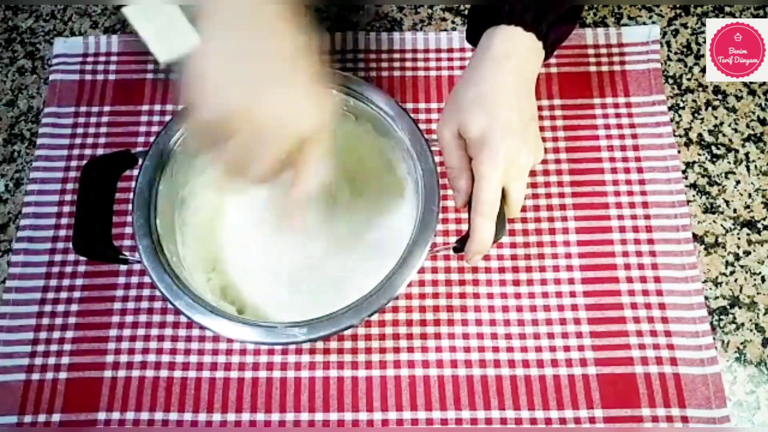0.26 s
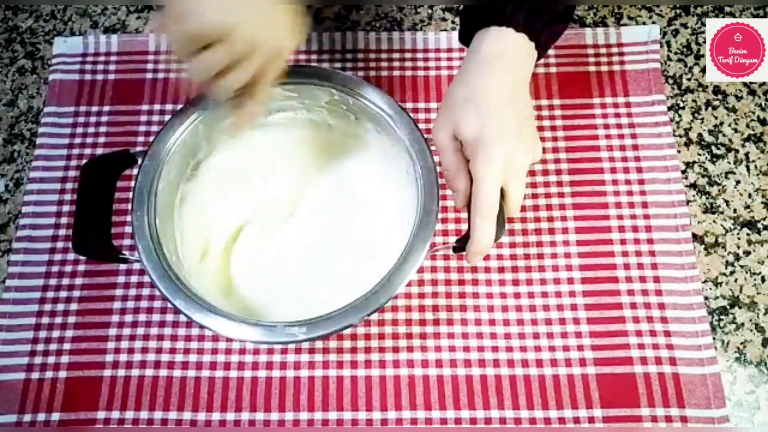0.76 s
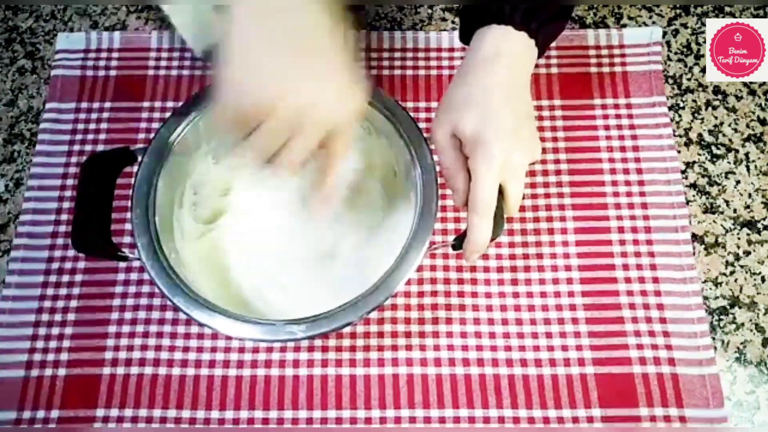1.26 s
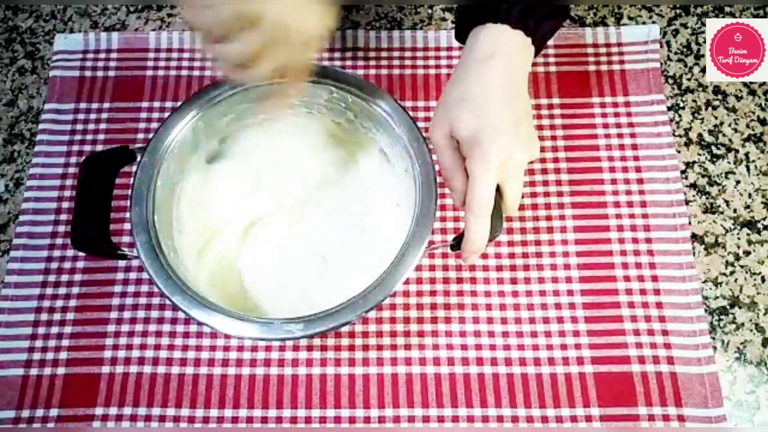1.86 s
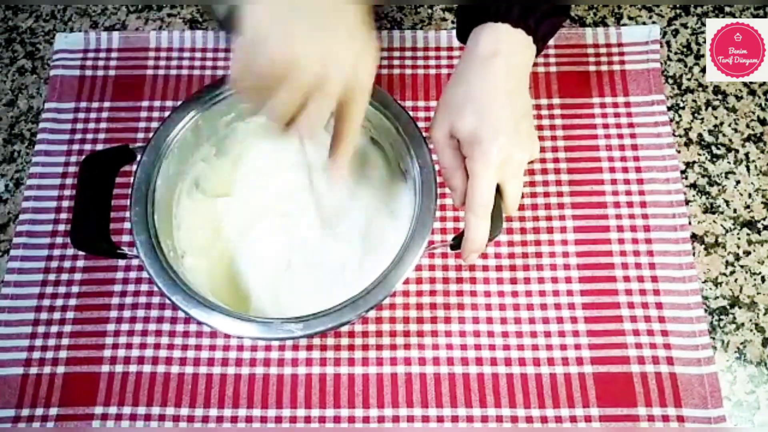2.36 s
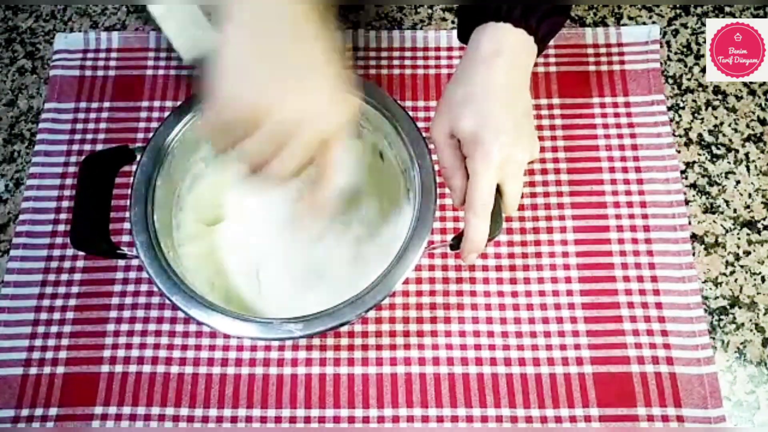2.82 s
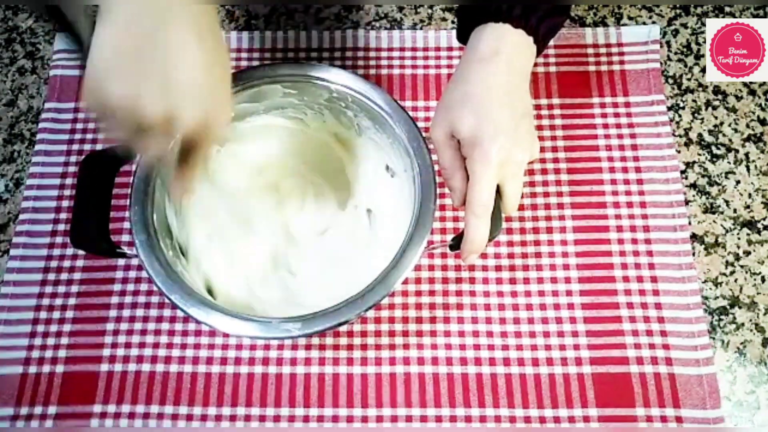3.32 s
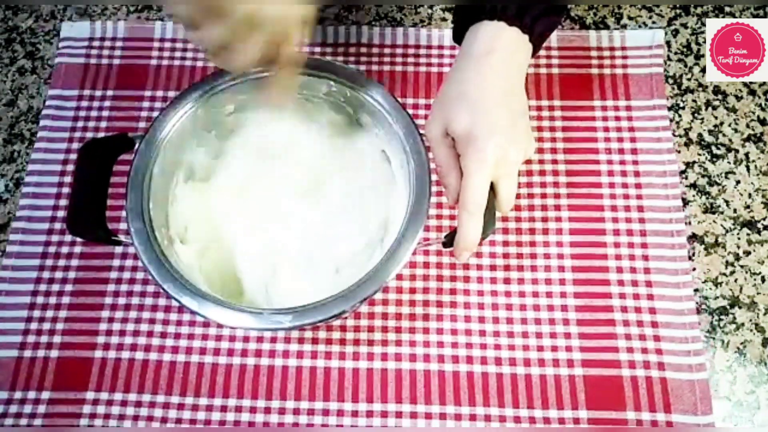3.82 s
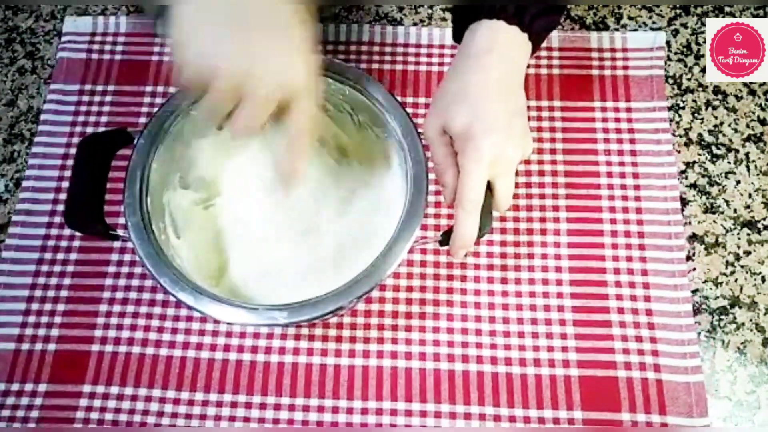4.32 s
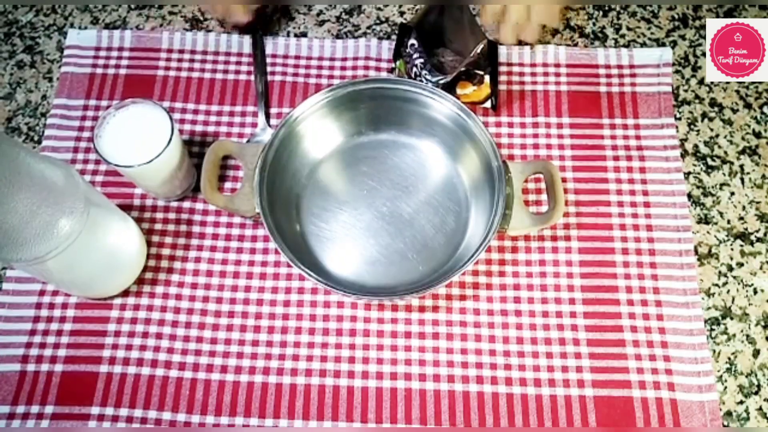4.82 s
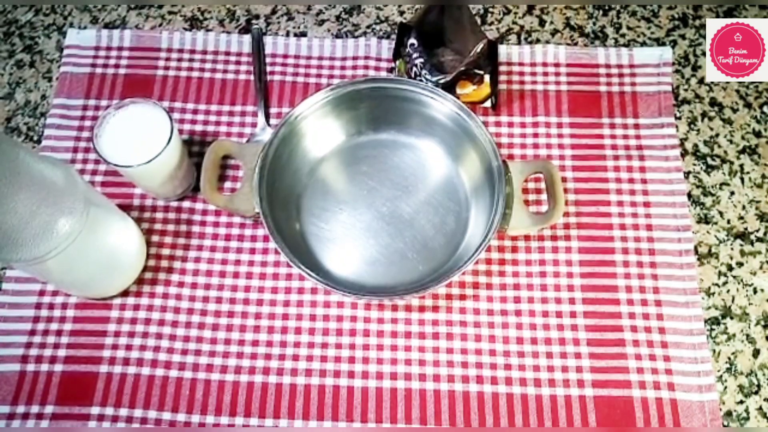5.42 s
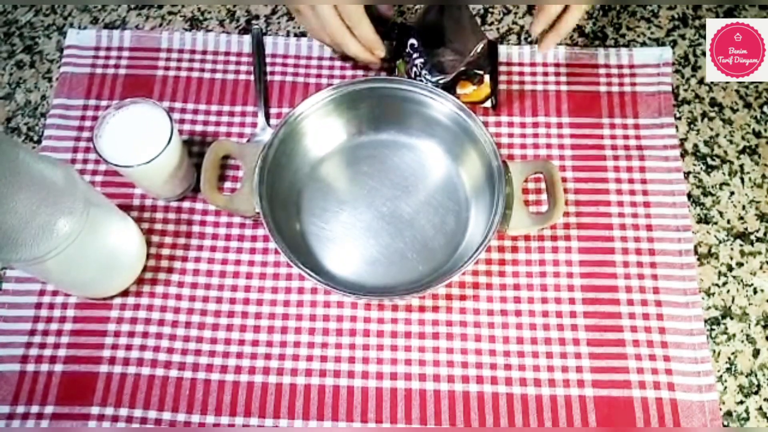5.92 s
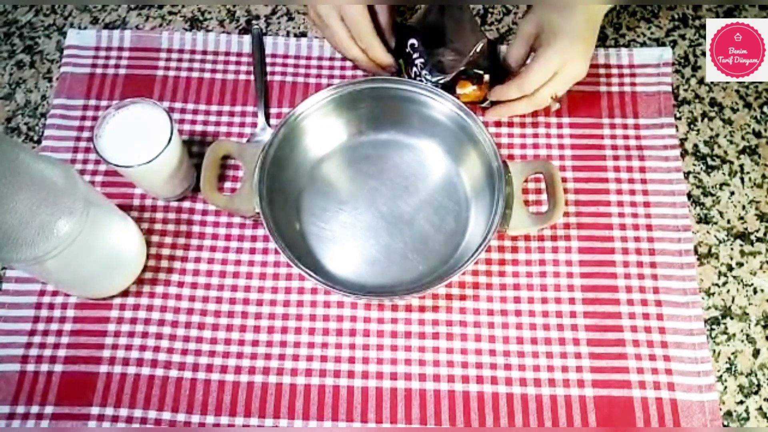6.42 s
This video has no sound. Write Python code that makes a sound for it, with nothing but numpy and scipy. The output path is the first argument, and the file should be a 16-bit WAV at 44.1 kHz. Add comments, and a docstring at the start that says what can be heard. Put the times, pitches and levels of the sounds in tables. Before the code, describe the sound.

Brisk metallic whisking and wet slosh in a metal pot stops dead, leaving faint hum, tiny ticks and thuds, and a brief foil rustle.

```python
"""Whisking cream, then a quiet kitchen

A wire whisk beats cream in a steel pot under a two-port phone microphone. Slip grains and noise make the
scrape and slosh, noise bursts with pings the taps, damped sines and resonances the pot's dull ring.
A hard edit silences it; a quiet kitchen fades in from shaped noise and mains sines, with damped-sine ticks,
thuds and faint thin high tones of a stirring wrapper, and the crackle of a foil sachet."""
import sys
import numpy as np
from scipy import signal
from scipy.fft import rfft, irfft, next_fast_len
from scipy.io import wavfile
from scipy.ndimage import uniform_filter1d, map_coordinates

SR = 44100
rng = np.random.default_rng(int(sys.argv[2]) if len(sys.argv) > 2 else 0)


def store_pcm(level_fs):
    """Save levels as 16-bit WAV."""
    pcm = np.round(np.clip(level_fs, -1, 1) * 32767).astype(np.int16)
    wavfile.write(sys.argv[1], SR, np.atleast_2d(pcm).T)


N = 294361
SCRAPE_TOP_HZ = 14350  # steep ceiling of the stirring and of cushioned taps


def whisk():
    """Several wires scrape at once; their slips shake the pot and stir the cream."""
    wire_db, slosh_db, body_db, wall_db, song_db = sweeps()
    flutter = amp(1.2 * wobble(40) + 1.8 * wobble(180))  # wires touch and leave the wall
    stir = amp(wire_db) * unit(scrape(flutter))
    stir = stir + amp(song_db) * unit(wire_song(flutter)) + skids()
    stir = stir + amp(slosh_db) * unit(slosh(flutter, wall_db))
    stir = stir + amp(body_db) * unit(pot_body())
    stir = filtered(amp(-1.5) * stir, scrape_ceiling)
    return stir + taps() + knocks() + plops()


# one sweep of the wires along the wall: start_s, swell_s, contact_s, scrape_landing_db, scrape_top_db,
# slosh_db, pot_body_db, wall_ring_db (re slosh), wire_song_db (re scrape top)
SWEEP_ROWS = [(0.0, 0.0063, 0.048, -26, -42.5, -50.5, -46, -2, -5),
              (.223, 0.073, .15, -28, -33.5, -47.5, -50, 2, -4.5),
              (0.502, 0.078, 0.23, -48.5, -32, -59.5, -48.5, -3, -4.5),
              (0.791, 0.016, .024, -34, -40, -61, -58.5, -2, 0),
              (.875, 0.13, 0.13, -37, -34, -50, -52.5, -0.5, -11),
              (1.04, 0.094, 0.16, -33, -36.5, -49, -53, -5.5, -12),
              (1.234, 0.097, .27, -32, -33.5, -50, -52.5, -2.5, -9.5),
              (1.449, 0.037, 0.049, -33, -33.5, -51, -52.5, -3, -8),
              (1.556, 0.1, 0.24, -38, -30.5, -46, -51, -4.5, -2),
              (1.98, 0.18, .29, -34, -32.5, -48, -53.5, -1, -6),
              (2.35, .01, 0.011, -39, -42.5, -60, -58, -3, -5),
              (2.379, 0.049, 0.05, -33.5, -31.5, -46, -48, -7, -6),
              (2.488, .01, 0.038, -36, -35.5, -50.5, -52, -3.5, -5),
              (2.547, .011, 0.004, -29, -34.5, -44.5, -46.5, -7.5, -13),
              (2.743, 0.13, .19, -36, -29.5, -48.5, -52.5, 2.5, -4.5),
              (3.005, .01, 0.073, -29, -39.5, -53.5, -55.5, -5, -4),
              (3.15, 0.085, 0.24, -33, -26.5, -42.5, -44.5, -4, -9.5),
              (3.52, 0.1, 0.24, -33.5, -25.5, -41.5, -48, -4.5, -5),
              (3.903, 0.094, 0.2, -35.5, -26.5, -42.5, -44, -8.5, -4),
              (4.14, .011, 0.08, -39.5, -32.5, -49.5, -47.5, -2, -4.5),
              (4.282, .12, 0.14, -36.5, -28.5, -43.5, -45, -5.5, 1)]
SAG_DB_PER_S, LIFT_DB_PER_S = 50.5, 220  # scrape past its top, and once the wires leave the wall
DRAG_DB = 6  # extra scrape drop while the wires only drag through cream
SLOSH_SAG_DB_PER_S, SLOSH_LIFT_DB_PER_S = 24.5, 94
WALL_FADE_DB_PER_S = 45
BODY_FOLLOWS, SONG_GROWS = 0.66, 1.2  # shares of the scrape's swing


def sweeps():
    """Levels of scrape, slosh, body, wall ring and song: each sweep lands at once, swells, sags, lifts off."""
    t = np.arange(N) / SR
    rows = np.array(SWEEP_ROWS)
    current = np.maximum(np.searchsorted(rows[:, 0], t, "right") - 1, 0)
    start, swell, contact, first_db, top_db, slosh_db, body_db, wall_db, song_db = rows.T[:, current]
    age = t - start
    off = np.maximum(age - contact, 0)
    swell_db = (first_db - top_db) * np.maximum(1 - age / swell, 0)
    sag_db = SAG_DB_PER_S * np.maximum(age - swell, 0)
    lift_db = np.minimum(LIFT_DB_PER_S * off, DRAG_DB + SAG_DB_PER_S * off)
    swing_db = swell_db - sag_db - lift_db
    return (top_db + swing_db,
            slosh_db - SLOSH_SAG_DB_PER_S * age - SLOSH_LIFT_DB_PER_S * off,
            body_db + BODY_FOLLOWS * swing_db,
            wall_db - WALL_FADE_DB_PER_S * age,
            top_db + song_db + SONG_GROWS * np.minimum(swing_db, 0))


# scraping wire colour: freq_hz, relative_db
WIRE_COLOUR = [(1760, -24.5), (3000, -11.5), (4200, -7.5), (5700, -7), (7840, 0.5), (10600, -6.5),
               (12200, -13.5), (13800, -12.5), (16400, -30)]


def scrape(flutter):
    """Wires stick and slip on the wall: bright slip grains over noise, the colour drifting."""
    slips = grains(per_s=1300, hz=7077, wide=0.22, cycles=4, spread_db=2.0, scatter=1.4, size=96)
    rub = slips + 0.7 * rng.standard_normal((2, N))
    return patchy(coloured(flutter * rub, WIRE_COLOUR), depth_db=3)


def scrape_ceiling(hz):
    """Steep low-pass at the top of the scrape."""
    return 1 / (1 + (hz / SCRAPE_TOP_HZ) ** 80)


def wire_song(flutter):
    """Pressed wires sing in a wandering band."""
    slips = grains(per_s=800, hz=7700, wide=0.18, cycles=4, spread_db=1, scatter=1.5, size=64)
    return wander(flutter * slips, [7100, 7700, 8270], width_hz=510, depth_db=4, rate=25)


# a wire skids briefly: middle_s, level_db, length_s, colour_hz
SKID_ROWS = [(.078, -31.5, 0.014, 8000), (.292, -29.5, 0.012, 6200), (.34, -29.5, 0.024, 8200),
             (.605, -28.5, .015, 7500), (.822, -31, 0.01, 6440), (.993, -34, .02, 8300),
             (1.135, -26, .01, 7200), (1.145, -27, 0.0047, 7200), (1.29, -33, .02, 7500),
             (1.322, -32, .01, 8800), (1.505, -34.5, .018, 8050), (1.672, -27, 0.017, 7600),
             (1.72, -31, .012, 7950), (3.012, -30.5, 0.012, 8500), (3.305, -23.5, 0.014, 7300),
             (4.069, -28, 0.014, 7640), (4.442, -26, .012, 7400)]
# a loose wire rings until the cream stops it: start_s, level_db, pitch_hz, length_s
LOOSE_WIRE = [(4.165, -44.5, 7569, .105)]
SKID_WIDTH = 0.12  # of its colour frequency


def skids():
    """Short rough rubs of resonated noise, each with its own colour, and the sine of a loose wire."""
    out = np.zeros((2, N + SR))
    half = 1500  # samples
    for middle_s, db, length_s, hz in SKID_ROWS:
        t = np.arange(-half, half) / SR
        b, a = signal.iirpeak(hz, 1 / SKID_WIDTH, SR)
        rub = unit(signal.lfilter(b, a, rng.standard_normal((2, len(t)))))
        swell = np.exp(-(2 * t / length_s) ** 2)
        out[:, round(middle_s * SR) - half:][:, :len(t)] += amp(db) * swell * rub
    for start_s, db, hz, length_s in LOOSE_WIRE:
        t = np.arange(int(length_s * SR)) / SR
        arch = np.sin(np.pi * t / length_s) ** .5
        out[:, round(start_s * SR):][:, :len(t)] += amp(db) * arch * np.sin(2 * np.pi * hz * t)
    return out[:, :N]


# cream colour: freq_hz, relative_db
CREAM_COLOUR = [(470, -39.5), (800, -0.5), (934, -9), (1140, -0.5), (1480, -3), (2110, -2.5), (2500, 0.5),
                (3030, -2.5), (4000, -23.5), (5200, -19.5), (8800, -120)]


def slosh(flutter, wall_db):
    """Cream splashes as lower-pitched grains in noise; the wall's ring near 2.6 kHz wavers in level."""
    drops = grains(per_s=900, hz=1822, wide=0.499, cycles=5.2, spread_db=3.5, scatter=5, size=320)
    splash = coloured(flutter * (drops + 1.6 * rng.standard_normal((2, N))), CREAM_COLOUR)
    wall = wander(splash, [2570, 2570, 2550], width_hz=230, depth_db=6, rate=15)
    return patchy(splash + amp(wall_db) * wall, depth_db=4.0)


# pot resonances: centre_hz, width_hz, gain_db
POT_MODES = [(235, 150, -6.5), (320.6, 13, -2), (470.7, 2, 2), (599, 73, 4), (722, 69, -1)]


def pot_modes(f):
    """Response of the steel pot: resonances summed with alternating sign."""
    return sum((-1) ** k * amp(db) * resonance(f, hz, width_hz)
               for k, (hz, width_hz, db) in enumerate(POT_MODES))


def pot_body():
    """Low bumps drive the pot's resonances."""
    bumps = grains(per_s=250, hz=564, wide=0.57, cycles=0.64, spread_db=4.5, scatter=4.1, size=200)
    return filtered(amp(1.1 * wobble(40)) * bumps, pot_modes)


# wire on wall: start_s, level_db, dull_db, left_minus_right_db
TAP_ROWS = [(0.0701, -27.5, -27, 7.5), (0.2256, -13, -16, -1.5), (0.326, -28.5, -27, 13),
            (0.5645, -21, -12, -3.5), (0.578, -15, -13, -1), (0.629, -14, -32, 2), (0.692, -27, -9.5, 4),
            (0.7927, -28, -29, 0), (0.819, -23, -42, 4.5), (0.89, -28, -27, 6.5), (0.9052, -18.5, -32, -3),
            (1.0536, -34, -26, -3), (1.119, -13.5, -34, -8), (1.2366, -10.5, -20, -5.5),
            (1.277, -26, -18, 13), (1.3186, -28.5, -34, 18), (1.3424, -30, -24, 7), (1.463, -29, -28, -9),
            (1.473, -25, -20, 16.5), (1.5565, -12, -18.5, 1), (1.587, -18, -22, -6), (1.6672, -13, -13, 0),
            (1.905, -40.5, -27, 6), (1.931, -27, -4.5, -2.5), (1.9847, -13, -19.5, -5),
            (2.001, -21, -22, 2), (2.0672, -13, -30, 0.5), (2.103, -20.5, -33, 9), (2.1444, -17, -28, -5.5),
            (2.381, -20.5, -29, -4.5), (2.4139, -25, -19.5, 12), (2.4882, -18, -29, 0.5),
            (2.55, -7, -10.5, 3), (2.7459, -27.5, -32, 17), (2.755, -29, -16, 0),
            (2.7786, -17.5, -18.5, -4), (2.8386, -25.5, -25.5, -1.5), (3.006, -20, -21, 1),
            (3.1246, -16, -12, 1), (3.1506, -11, -36, -2), (3.18, -21, -23, 4), (3.224, -16, -20.5, 3.5),
            (3.2322, -10.5, -19.5, 5.5), (3.31, -17, -5.5, -2.5), (3.523, -11.5, -18.5, -1),
            (3.6135, -18, -10.5, 2.5), (3.905, -33, -6, -4), (3.9284, -28.5, -24.5, 2),
            (4.0061, -20.5, -31, -0.5), (4.009, -10, -25, 4), (4.092, -18.5, -39.5, -0.5),
            (4.1622, -12, -45.5, 3), (4.219, -25, -31, 0), (4.285, -7, -34.5, 0),
            (4.3173, -15.5, -20.5, -4.5), (4.349, -12.5, -18.5, -0.5), (4.404, -17.5, -30, -4.5),
            (4.413, -13.5, -18, 1.5)]
# taps square on the steel: start_s
HARD_TAPS = [.2256, 1.119, 1.2359, 1.5569, 1.931, 2.55, 2.7784, 3.1243, 3.1508, 3.523, 4.285]
PING_HZ, PING_SPREAD = 7580, 0.085  # each tap pings a different wire
SOFT_HZ = 11100  # cream cushions the other taps above this


def taps():
    """Wires strike the wall; only taps square on the steel keep their full treble."""
    rows = [(*row, PING_HZ * np.exp(PING_SPREAD * rng.standard_normal())) for row in TAP_ROWS]
    hard = [row for row in rows if np.min(np.abs(row[0] - np.array(HARD_TAPS))) < .004]
    soft = [row for row in rows if row not in hard]
    hard_taps = snaps(hard, WIRE_COLOUR, CREAM_COLOUR, t60=0.0087)
    soft_taps = snaps(soft, WIRE_COLOUR, CREAM_COLOUR, t60=0.0082)
    cushion = lambda hz: amp(4) / (1 + 1j * hz / SOFT_HZ) * scrape_ceiling(hz)
    return hard_taps + filtered(soft_taps, cushion)


# whisk head on the bottom: start_s, level_db, ring_hz
KNOCK_ROWS = [(0.227, -35, 605), (0.393, -34, 510), (1.118, -37, 634), (1.26, -38.5, 586),
              (1.613, -41, 620), (1.874, -41.5, 605), (2.116, -37.5, 625), (2.529, -26, 524),
              (2.56, -31.5, 474), (2.608, -37, 440), (3.18, -39.5, 610), (3.313, -34, 703),
              (3.37, -33.5, 590), (3.601, -30.5, 606), (3.987, -36, 640), (4.114, -32.5, 640),
              (4.319, -34.5, 610), (4.374, -31, 573)]
CRACK_DB = -16.5  # crack re the row's level


def knocks():
    """The whisk head hits the bottom: a short ring, a crack, and the pot singing on after the blow."""
    ring = rings([(s, db, hz, .024) for s, db, hz in KNOCK_ROWS], rough=.15, rise=0.00035)
    crack_rows = [(s, db + CRACK_DB, -20, 0, hz) for s, db, hz in KNOCK_ROWS]
    crack = snaps(crack_rows, CREAM_COLOUR, WIRE_COLOUR, t60=0.0042)
    return ring + amp(4.5) * filtered(ring, pot_modes) + crack


# a wire slaps through the cream: start_s, level_db, ring_hz
PLOP_ROWS = [(0.5634, -33, 2600), (1.238, -39, 2730), (1.474, -34, 2680), (1.5857, -35, 1850),
             (1.6681, -35, 2670), (1.6885, -37, 2480), (1.8068, -36, 2800), (1.8756, -41, 1660),
             (2.4477, -28.5, 1440), (2.7831, -34.5, 2540), (3.3139, -21, 1560), (3.5402, -27, 1787),
             (3.6025, -31, 1310), (3.6244, -40, 2910), (3.907, -29, 2530), (4.0108, -33.5, 1440),
             (4.1153, -39, 1440), (4.3233, -27.5, 1120), (4.3774, -30.5, 1170)]


def plops():
    """Wires slap the cream: cream-coloured bursts with a lower ping."""
    rows = [(s, db, -6, 0, hz) for s, db, hz in PLOP_ROWS]
    return snaps(rows, CREAM_COLOUR, CREAM_COLOUR, t60=0.0094)


# port colour: freq_hz, left_minus_right_db
PORT_COLOUR = [(60, 5.5), (99, -5.5), (160, 1.5), (270, 0.5), (450, -0.5), (740, 0), (1220, 0.5),
               (2010, -1), (3330, 1.5), (5500, -5), (9080, 7.5), (15000, 3.5)]
LAG_S = 6 / SR


def ports(x):
    """The right port hears the sound first; each port has its own colour."""
    side = np.array([[1], [-1]]) / 2

    def response(hz):
        return amp(side * along(PORT_COLOUR, hz)) * np.exp(-2j * np.pi * hz * side * LAG_S)

    return filtered(x, response)


# reverberation: freq_hz, t60_s
KITCHEN_DECAY = [(200, 0.409), (1000, 0.31), (5000, 0.21), (13500, 0.22), (15000, 0.017)]
# likeness of the room at both ports: freq_hz, shared_power_fraction
KITCHEN_SHARE = [(100, 0.95), (600, 1), (1500, 0.18), (4000, 0.041)]


def kitchen(x, wet_db, step=SR // 4):
    """Tiled walls answer with decaying noise, redrawn for each step, its bass alike at both ports."""
    out = np.zeros((2, N + SR))
    for a in range(0, N, step):
        hz, t, z = signal.stft(rng.standard_normal((3, SR // 2)), SR, nperseg=256)
        share = np.clip(along(KITCHEN_SHARE, hz), 0, 1)[:, None]
        z = np.sqrt(share) * z[0] + np.sqrt(1 - share) * z[1:]
        decay = amp(-60 * t / along(KITCHEN_DECAY, hz)[:, None])
        tail = signal.istft(z * decay, SR, nperseg=256)[1]
        wet = signal.fftconvolve(x[:, a:a + step], tail / np.linalg.norm(tail[0]), axes=1)
        out[:, a + 130:][:, :wet.shape[1]] += wet  # 130 samples of pre-delay
    return x + amp(wet_db) * out[:, :N]


# boom level: time_s, level_db
BOOM_LEVEL = [(0.0, -62), (0.3, -71), (1.4, -62.5), (1.9, -71.5), (2.1, -59.5), (2.6, -60), (2.75, -67.5),
              (3.85, -64), (4.0, -52), (4.47, -64.5)]


def counter_boom():
    """The counter booms under the rocking pot: a narrow low noise band with a moving level."""
    colour = [(40, -36.5), (70, -9.0), (85, 3.0), (110, -11.0), (200, -46.5)]  # freq_hz, relative_db
    return amp(curves(BOOM_LEVEL)[0]) * room_tone(colour, own=0.18)


# first room tone: freq_hz, relative_db
RUMBLE_COLOUR = [(15, -50.5), (25, -13), (49, -14), (77, -6.5), (102, 3), (231, 4.5), (291, -4.5),
                 (413, -13.5), (450, -7.5), (580, -36), (990, -120)]


def rumble():
    """Steady low room noise and mains hum under the whisking."""
    return amp(-59.0) * room_tone(RUMBLE_COLOUR, own=0.24) + amp(-62.5) * hum()


# foil snaps: start_s, level_db, dull_db, left_minus_right_db, ping_hz
SACHET_SNAPS = [(6.493, -24.5, -24, 6, 8340), (6.501, -37, -20, 6, 8600), (6.51, -44, -5.5, -11.5, 1010),
                (6.521, -35.5, -1, 5, 1180), (6.521, -40, -12, 5, 2430), (6.536, -37, -17, 5, 3500)]
# foil colour: freq_hz, relative_db
FOIL_COLOUR = [(240, -65), (400, -52), (541, -18), (812, -17), (972, -10), (1400, -7.5), (1650, -8),
               (3940, -10), (6780, 2.5), (9870, 1), (14600, -22)]


def sachet():
    """Foil crackles: sharp snaps over a brief rustle of crease grains."""
    t = np.arange(N) / SR
    creases = grains(per_s=900, hz=2940, wide=0.886, cycles=4.9, spread_db=0.5, scatter=4.2, size=200)
    swell = amp(-42 - 60 * np.abs(t - 6.515) / 0.16) * (t > 6.492)
    rustle = swell * unit(coloured(creases, FOIL_COLOUR))
    return snaps(SACHET_SNAPS, FOIL_COLOUR, CREAM_COLOUR, t60=0.01) + rustle


# onsets: start_s, level_db
TONE_ONSETS = [(6.275, -9), (6.301, 2.5)]
# tones: pitch_hz, level_db, t60_s
HIGH_TONES = [(6600, -79, 0.39), (8260, -80, .4), (8920, -82.5, .35), (10500, -88, 0.38)]


def faint_high_tones():
    """Faint thin high tones of a stirring wrapper, in two onsets: damped sines with a soft attack."""
    rows = [(s, db + onset_db, hz, t60_s) for s, onset_db in TONE_ONSETS for hz, db, t60_s in HIGH_TONES]
    return rings(rows, rough=0.43, rise=.006)


# faint far rings: start_s, level_db, pitch_hz, t60_s
TICK_ROWS = [(4.555, -91, 725, .35), (4.645, -91, 718, .15), (5.418, -74, 1768, .05),
             (5.418, -80, 1398, 0.058), (5.418, -84, 2200, .04), (5.515, -80, 1314, .15),
             (5.524, -75, 950, .13), (5.526, -80, 2620, .08), (5.525, -78, 1144, 0.22),
             (5.568, -91, 1713, 0.54), (5.77, -82, 1490, .09), (5.777, -76, 923, 0.086)]


def ticks():
    """Faint far ticks as roughened damped sines."""
    return rings(TICK_ROWS, rough=0.53, rise=.002)


# faint low thuds: start_s, level_db, pitch_hz, t60_s
THUD_ROWS = [(4.79, -52, 90, .06), (4.79, -58, 50, .06), (5.91, -60, 150, .08), (6.49, -60, 60, .15),
             (6.51, -57, 149, .15)]


def thuds():
    """Faint thuds as smoother low damped sines."""
    return rings(THUD_ROWS, rough=0.092, rise=0.001)


# second room tone: freq_hz, relative_db
QUIET_COLOUR = [(15, -68.5), (25, -40), (70, -11), (82, -7.5), (102, -0.5), (229, -12), (371, -40),
                (450, -42), (580, -71), (990, -120)]
# its fade, hum included: time_s, level_db
QUIET_FADE = [(4.55, -97), (4.76, -77), (4.79, -68.5), (6.67, -70)]


def quiet_tone():
    """Unsteady low room noise and mains hum fade in."""
    noise = 1.17 * amp(2.7 * wobble(30)) * room_tone(QUIET_COLOUR, own=0.48)
    return amp(curves(QUIET_FADE)[0]) * (noise + hum())


# mains lines: pitch_hz, relative_db
HUM_LINES = [(100, -2.5), (200, -14.5)]


def hum():
    """Slightly unsteady mains lines."""
    t = np.arange(N) / SR
    return sum(amp(db + 1.5 * wobble(26)) * np.sin(2 * np.pi * hz * t) for hz, db in HUM_LINES)


# microphone hiss: freq_hz, relative_db
HISS_COLOUR = [(260, -38), (450, -2.5), (1380, -5), (1580, -8), (7810, -11.5), (16000, -15)]
# its fade: time_s, level_db
HISS_LEVEL = [(4.55, -110), (4.7, -99), (4.85, -87.5), (6.67, -87.5)]


def hiss():
    """Microphone hiss, mostly independent at each port, fades in."""
    return amp(curves(HISS_LEVEL)[0]) * room_tone(HISS_COLOUR, own=2.4)


def room_tone(spectrum, own):
    """Noise of rms 1, shared by the ports but for a share of their own."""
    a = rng.standard_normal((3, N))
    return unit(coloured(a[0] + own * a[1:], spectrum))


def snaps(rows, bright, dull, t60):
    """Each contact is a short noise burst, bright and dull, plus a brief ping, placed between the ports."""
    force, t = np.zeros((3, 2, N + SR)), np.arange(600) / SR
    for s, db, dull_db, pan_db, hz in rows:
        fall = amp(db - 60 * t / t60) * (1 - np.exp(-t / 0.00098))
        fall = fall * amp([[pan_db / 2], [-pan_db / 2]])
        noise = rng.standard_normal((3, len(t)))
        burst = fall * unit(np.tanh(noise[0] + 0.86 * noise[1:]))  # tanh: no freak peaks
        ping = fall * np.sin(2 * np.pi * hz * t)
        force[:, :, round(s * SR):][..., :len(t)] += np.array([burst, amp(dull_db) * burst, ping])
    bright_burst, dull_burst, pings = force[:, :, :N]
    return coloured(bright_burst, bright) + coloured(dull_burst, dull) + pings


def rings(rows, rough, rise):
    """Damped sines, cut at a quarter second, their strength shaken by slow noise."""
    out, t = np.zeros(N + SR), np.arange(SR // 4) / SR
    for s, db, hz, t60 in rows:
        smooth = np.hanning(60 + int(8 * SR / hz))
        shake = 1 + rough * unit(signal.fftconvolve(rng.standard_normal(len(t)), smooth, "same"))
        fall = amp(db - 60 * t / t60) * (1 - np.exp(-t / rise))
        out[round(s * SR):][:len(t)] += fall * shake * np.sin(2 * np.pi * hz * t)
    return out[:N]


def grains(per_s, hz, wide, cycles, spread_db, scatter, size):
    """Slips of rms 1: damped sines of random pitch and strength, reaching the ports a few samples apart."""
    count = int(per_s * N / SR)
    u, g = rng.random((count, 1)), rng.standard_normal((count, 4))
    pitch = np.clip(hz * np.exp(wide * g[:, :1]), 50, SR / 2.5)
    k = np.arange(size)
    strength = amp(spread_db * np.clip(g[:, 1:2], -2, 2))
    wave = strength * np.sin(2 * np.pi * pitch * k / SR) * np.exp(-k * pitch / SR / cycles)
    start = [np.abs(u * N + side * scatter * g[:, 2:3]).astype(int) + k for side in (1, -1)]
    return unit(np.array([np.bincount(s.ravel(), wave.ravel(), N)[:N] for s in start]))


def patchy(x, depth_db):
    """The colour drifts as the wires move over the wall: a smooth random gain over time and frequency."""
    z = signal.stft(x, nperseg=256)[2]
    field = uniform_filter1d(rng.standard_normal(z.shape[1:]), 5, 0)
    field = uniform_filter1d(field, 12, 1)
    return signal.istft(z * amp(depth_db * unit(field)), nperseg=256)[1][:, :N]


def resonance(f, hz, width_hz):
    """Response of one damped mode, 1 at its centre."""
    return 1j * f * width_hz / (hz * hz - f * f + 1j * f * width_hz)


def wander(x, centres_hz, width_hz, depth_db, rate):
    """Neighbouring fixed resonances, each wavering in level on its own."""
    return sum(amp(depth_db * wobble(rate)) * filtered(x, lambda f: resonance(f, hz, width_hz))
               for hz in centres_hz)


def amp(db):
    """dB to gain."""
    return 10 ** (np.asarray(db) / 20)


def unit(x):
    """Rms 1."""
    return x / np.sqrt(np.mean(x ** 2) + 1e-20)


def along(points, hz):
    """Interpolates (freq_hz, value) points on a log axis."""
    f, v = np.transpose(points)
    return np.interp(np.log(hz + 1), np.log(f + 1), v)


def curves(rows):
    """One value per sample for each column after the time."""
    s, *cols = np.transpose(rows)
    return [np.interp(np.arange(N) / SR, s, c) for c in cols]


def wobble(rate):
    """A smooth random curve, rate knots a second."""
    return map_coordinates(rng.standard_normal(int(N * rate / SR) + 4), [np.arange(N) * rate / SR])


def filtered(x, response):
    """x times a complex response of frequency."""
    m = next_fast_len(N + SR // 2)
    return irfft(rfft(x, m) * response(np.fft.rfftfreq(m, 1 / SR)), m)[..., :N]


def causal(spectrum, size=2048):
    """Minimum-phase impulse response of a spectrum, energy 1."""
    cep = irfft(np.log(amp(along(spectrum, np.fft.rfftfreq(size, 1 / SR))) + 1e-4))
    cep[1:size // 2] *= 2  # fold the cepstrum
    cep[size // 2 + 1:] = 0
    h = irfft(np.exp(rfft(cep)))
    return h / np.linalg.norm(h)


def coloured(x, spectrum):
    """x through the causal colour."""
    return signal.fftconvolve(np.atleast_2d(x), causal(spectrum)[None], axes=1)[:, :N]


CUT_S, RESUME_S = 4.477, 4.55


def scene():
    """Whisking up to the hard edit, a silent gap, then the quiet kitchen."""
    t = np.arange(N) / SR
    first = ports(kitchen(whisk(), wet_db=-6)) + counter_boom() + rumble()
    near = kitchen(sachet() + faint_high_tones(), wet_db=-4.5)
    second = near + ticks() + thuds() + quiet_tone() + hiss()
    return first * (t < CUT_S) + second * (t > RESUME_S)


BASS_HZ, TOP_HZ = 45, 16450


def record(dry):
    """Deep bass rolls off; a steep low-pass closes the top."""
    dry = filtered(dry, lambda hz: (1j * hz / (BASS_HZ + 1j * hz)) ** 2)
    return filtered(dry, lambda hz: 1 / (1 + (hz / TOP_HZ) ** 200))


dry = scene()
out = record(dry)
store_pcm(out)
```